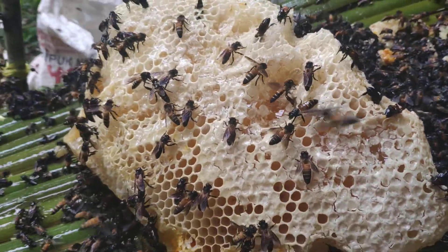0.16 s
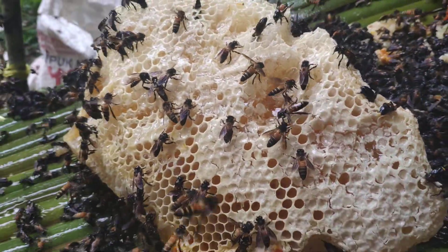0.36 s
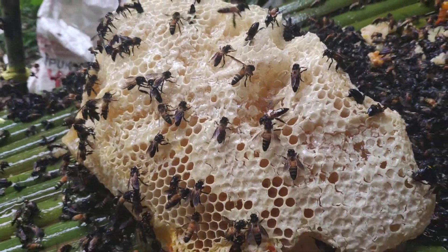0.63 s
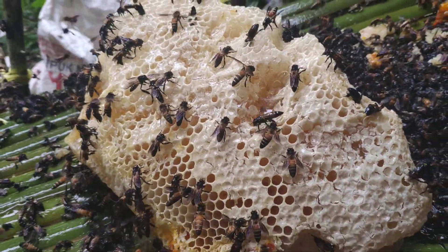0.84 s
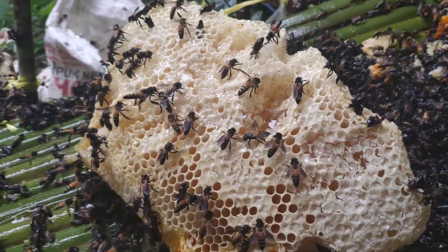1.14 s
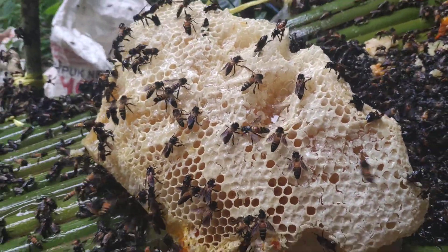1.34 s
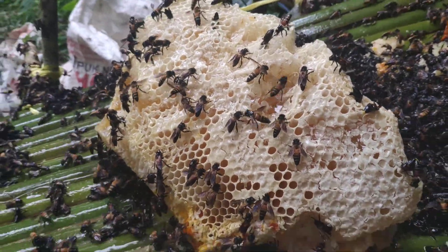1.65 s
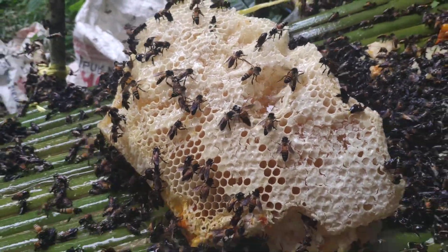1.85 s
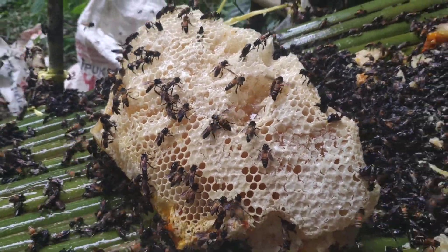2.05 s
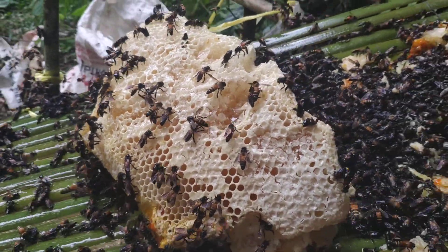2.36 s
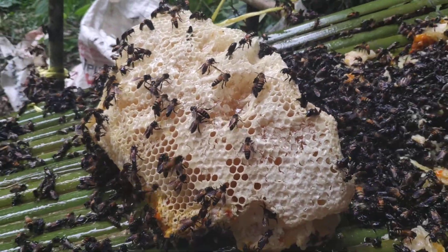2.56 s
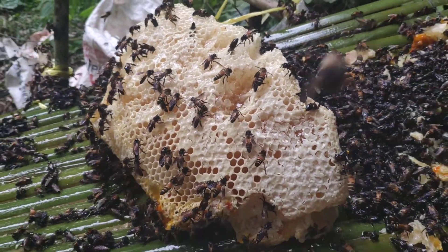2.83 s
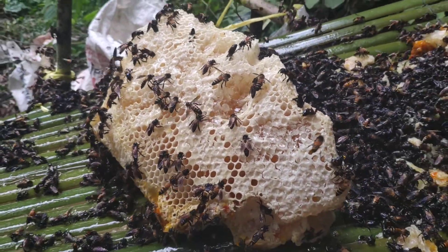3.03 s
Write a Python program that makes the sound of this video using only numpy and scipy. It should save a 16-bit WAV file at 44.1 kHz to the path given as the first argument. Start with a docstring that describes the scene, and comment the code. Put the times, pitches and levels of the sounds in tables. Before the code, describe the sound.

A swarm of bees buzzes low and close throughout, outdoors, over a fizzing rustle of bees crawling on leaves. One bee passes on the left at about 0.7 seconds, and another hovering on the right swells near 1 second. Short scrapes follow, then sharp little ticks at 1.7 and 1.9 seconds. A raspy wing brush and a scrape come around 2.5 seconds, with faint passes as the buzz continues.

```python
"""A colony of bees swarms close by, outdoors, around a broken-off honeycomb lying on palm leaves.
From the start, dozens of beating wings merge into a low buzz over the fizzing rustle of crawling bees.
In the first second a bee passes on the left, wings brush the comb, and a bee hovering on the right swells.
Short scrapes follow, and just before two seconds bees strike leaf and comb with the sharpest ticks.
Another brush, a scrape and a few fainter passes come last, while the buzz and rustle carry on."""
import sys
import numpy as np
from scipy import signal
from scipy.fft import rfft, irfft
from scipy.io import wavfile

SR = 44100
rng = np.random.default_rng(int(sys.argv[2]) if len(sys.argv) > 2 else 0)


def master_out(mix):
    """Clip the mix to full scale and print it as 16-bit PCM to the path in sys.argv[1]."""
    frames = np.transpose(np.atleast_2d(mix))
    ceiling = np.clip(frames, -1, 1)
    pcm = np.round(ceiling * 32767).astype(np.int16)
    wavfile.write(sys.argv[1], SR, pcm)


N = 140679

# The tone of a wing stroke in the swarm. Each row: frequency in Hz, relative level in dB.
SWARM_OVERTONES = [(135, -4.5), (255, 3), (300, 2), (410, -7), (550, -9), (720, -7.5), (1000, -12.5),
                   (1400, -19.5), (2500, -28), (4000, -39)]
SWARM_HZ, SPREAD_HZ, RISE_HZ_PER_S = 137.2, 9.5, 1.3  # wingbeats differ between bees and slowly speed up
WANDER_HZ, WANDER_PER_S, SWELL_DB = 3.5, 5, 2.5
SWARM_DB, SWARM_PAN_DB, WIDTH_DB = -37.5, -1, 6
SIDE_DELAY_S, LEFT_LEAD_S = 0.00043, 0.000074  # sound reaches the nearer side first


def swarm(bees=32, size=1024):
    """Many flying bees, each with its own wing stroke, wandering pitch, distance and side."""
    out, overtones = np.zeros((2, N)), np.arange(1, 24)
    from_middle_s = (np.arange(N) - N / 2) / SR
    rank = (np.arange(bees) + .5) / bees
    offsets = unit(np.log(rank / (1 - rank)))  # most bees stay near the average pitch
    for offset, bearing in zip(offsets, rng.permutation(2 * rank - 1)):
        mean_hz = SWARM_HZ + SPREAD_HZ * offset
        hz = mean_hz + RISE_HZ_PER_S * from_middle_s + WANDER_HZ * drift(WANDER_PER_S)
        beats = np.cumsum(hz) / SR
        strengths = amp(read(SWARM_OVERTONES, overtones * mean_hz))
        phases = np.exp(2j * np.pi * rng.random(len(overtones)))
        stroke = irfft(np.r_[0, strengths * phases], size)  # one wingbeat, played in a loop
        loop = np.r_[stroke, stroke[0]]
        gains = amp(SWELL_DB * drift(WANDER_PER_S)) * pan(WIDTH_DB * bearing)
        lead = mean_hz * (SIDE_DELAY_S * bearing + LEFT_LEAD_S) / 2
        for side, shift in enumerate((lead, -lead)):
            out[side] += gains[side] * np.interp((beats + shift) % 1 * size, np.arange(size + 1), loop)
    return amp(SWARM_DB) * pan(SWARM_PAN_DB) * unit(out)


# The hovering bee's flight. Each row: time in seconds, wingbeat in Hz, relative level in dB.
HOVER_PATH = [(0, 133.8, -41), (.12, 137.8, -37), (.28, 133, -69), (.47, 137.2, -35.5), (.56, 135.7, -45),
              (0.639, 133.7, -32.5), (.74, 129.7, -36), (.84, 129.6, -25), (1.031, 129.3, -25.5),
              (1.09, 125.4, -38.5), (1.13, 129.8, -30.5), (1.21, 133.5, -30), (1.37, 127.6, -41),
              (1.47, 130, -30.5), (1.66, 130.2, -44.5), (1.74, 132.7, -29.5), (1.87, 131.5, -27.5),
              (1.96, 133, -44), (2.04, 129.8, -35), (2.18, 129.6, -32.5), (2.33, 131.2, -38.5),
              (2.43, 129.2, -32.5), (2.72, 129, -35), (2.8, 136, -40), (2.88, 131, -37.5), (3.19, 133, -40)]
# The tone of one bee, hovering or passing. Each row: frequency in Hz, relative level in dB.
BEE_OVERTONES = [(130, 2), (260, -7.5), (390, -14), (520, -16), (660, -16), (800, -18.5), (1100, -26.5),
                 (1600, -38.5), (4000, -35)]
# Brief swells of its octave. Each row: middle in seconds, half length in seconds, level in dB.
OCTAVE_FLARES = [(0.487, 0.037, -43), (0.891, 0.034, -33), (0.983, .03, -32), (1.344, .03, -36),
                 (1.618, 0.024, -30), (1.754, 0.012, -30), (2.1, 0.057, -33)]


def hovering_bee(gain_db=-3, left_db=-27, jitter_hz=1.367):
    """One bee hangs on the right, moving in and out; now and then its octave flares."""
    times, path_hz, path_db = np.transpose(HOVER_PATH)
    t = np.arange(N) / SR
    level = amp(gain_db + np.interp(t, times, path_db))
    flares = sum(amp(db) * np.exp(-((t - at) / half) ** 2) for at, half, db in OCTAVE_FLARES)
    hz = np.interp(t, times, path_hz) + jitter_hz * drift(24.5)
    buzz = wingbeat(hz, BEE_OVERTONES, count=22, octave=flares / level)
    return level * buzz * amp([[left_db], [0]])


# Bees flying past. Each row: nearest moment in seconds, half length in seconds, wingbeat in Hz,
# relative level in dB.
FLY_PASTS = [(0.658, 0.03, 143.5, -28.5), (0.956, 0.035, 150.3, -40), (2.124, 0.043, 120.3, -40),
             (2.739, 0.086, 143.1, -46), (3.161, 0.057, 142, -43)]


def passing_bees(glide_hz=1.5, right_db=-13.5):
    """Each bee on the left swells and fades with distance while its pitch falls a little."""
    out = np.zeros(N)
    for at, half, hz, db in FLY_PASTS:
        along = (np.arange(N) / SR - at) / half
        buzz = wingbeat(hz - glide_hz * np.tanh(along), BEE_OVERTONES, count=10)
        out += amp(db) / (1 + along ** 2) * buzz
    return out * amp([[0], [right_db]])


# Wings touching the comb. Each row: middle in seconds, half length in seconds, level in dB,
# left minus right in dB.
WING_BRUSHES = [(0.693, .06, -50, -6), (1.246, 0.095, -47, -2), (2.441, 0.056, -42, -5)]
# Their raspy tone. Each row: frequency in Hz, relative level in dB.
BRUSH_OVERTONES = [(300, -10), (700, -1), (1020, 4), (1500, -10), (1900, -19), (2450, -1.5), (3400, -24)]


def wing_brushes(wingbeat_hz=147.7, jitter_hz=4):
    """Wings brush the comb for a moment: an unsteady buzz that is nearly all overtones."""
    t, level = np.arange(N) / SR, np.zeros((2, N))
    for at, half, db, pan_db in WING_BRUSHES:
        level += amp(db) * pan(pan_db) * np.exp(-((t - at) / half) ** 2)
    hz = wingbeat_hz + jitter_hz * drift(41.4)
    return level * np.array([unit(wingbeat(hz, BRUSH_OVERTONES, count=24)) for side in range(2)])


# How loud the crawling is. Each row: time in seconds, relative level in dB.
CRAWL_LEVELS = [(0, -33.5), (.45, -33), (.62, -32.5), (.75, -33), (.9, -32), (1.05, -32.5), (1.4, -33.5),
                (1.63, -33), (1.78, -31.5), (2.2, -32), (2.42, -33), (2.56, -32), (2.72, -33), (3.02, -33),
                (3.12, -32.5), (3.19, -31.5)]
HISS_DB, FLICKER_DB = 2.5, .5
STEPS_DB, STEPS_PER_S = -4.5, 1500
SCUFF_DB, SCUFFS_PER_S, SCUFF_DECAY_S = -7, 100, 0.0019


def crawling():
    """Countless feet and wings scrape the leaves: a fine hiss with nearer steps and scuffs."""
    times, db = np.transpose(CRAWL_LEVELS)
    hiss = rng.standard_normal((2, N)) * amp(FLICKER_DB * drift(19))
    fade = np.exp(-2 / SCUFF_DECAY_S / SR)  # each scuff starts suddenly and dies quickly
    scuff_power = signal.lfilter([1], [1, -fade], abs(contacts(SCUFFS_PER_S)))
    scuffs = unit(np.sqrt(scuff_power) * rng.standard_normal((2, N)))
    touches = amp(HISS_DB) * hiss + amp(STEPS_DB) * contacts(STEPS_PER_S) + amp(SCUFF_DB) * scuffs
    return amp(np.interp(np.arange(N) / SR, times, db)) * bright_ring(touches)


# The tone of the rustle. Each row: frequency in Hz, relative left and right levels in dB.
RUSTLE_SPECTRUM = [(298, -28.5, -32.5), (1450, -23, -17.5), (3160, -20.5, -19), (4370, -20, -17),
                   (6140, -17.5, -14.5), (6820, -11.5, -10), (7490, -16.5, -7.5), (8500, -9, 0),
                   (9720, -5, -6), (10420, -8, -12), (12270, -17, -13.0), (14000, -16.5, -15.5),
                   (15400, -20, -15.5)]


def bright_ring(touches, size=2048):
    """Every small contact gets a bright ring, a little different on each side."""
    hz, table = np.fft.rfftfreq(size, 1 / SR), np.array(RUSTLE_SPECTRUM)
    gain = amp([read(table[:, [0, 1]], hz), read(table[:, [0, 2]], hz)])
    log_gain = np.log(np.concatenate([gain, gain[:, -2:0:-1]], axis=1))
    spectrum = np.exp(np.conj(signal.hilbert(log_gain)))  # makes the ring come after the touch
    ring = np.fft.ifft(spectrum).real[:, :size // 2]
    ring /= np.sqrt(np.sum(ring ** 2) / 2)
    return signal.oaconvolve(touches, ring, axes=1)[:, :touches.shape[1]]


# Nearer bees scraping. Each row: start in seconds, length in seconds, level in dB, left minus right in dB.
NEAR_SCRAPES = [(1.097, 0.047, -30, 4), (1.25, .04, -30.5, -2), (1.707, .03, -38, -7),
                (2.559, 0.033, -33, -5)]


def scrapes(grains_per_s=1500):
    """A nearer bee scrapes the leaf: a grainy burst that starts quickly and dies away."""
    level = np.zeros((2, N))
    for start, length, db, pan_db in NEAR_SCRAPES:
        progress = np.maximum(np.arange(N) / SR - start, 0) / length
        level += amp(db) * pan(pan_db) * np.minimum(10 * progress, 1) * np.exp(-progress ** 2)
    grains = unit(contacts(grains_per_s) + rng.standard_normal((2, N)))
    return bright_ring(level * grains)


# Sharp little knocks. Each row: start in seconds, level in dB, left minus right in dB, pitch in Hz,
# rise time in seconds.
BEE_STRIKES = [(0.097, -21, -3, 12500, .00008), (1.2592, -18, -4, 8900, .0003),
               (1.7222, -9.5, -8, 12500, .00005), (1.73, -15, -9, 11500, .00006),
               (1.7414, -18, -6, 10500, .00004), (1.9113, -9.3, 10, 9700, .00017),
               (1.9147, -22, -3, 9200, .0003)]
BODY_HZ, BODY_DB, BODY_DECAY_S = 4800, -22, 0.002
SCATTER_GAIN, SCATTER_DECAY_S = 0.2, 0.0037


def ticks(size=1024):
    """Bees strike leaf and comb: a bright snap, a lower ring of the leaf and a short scatter of noise."""
    out, t = np.zeros((2, N)), np.arange(size) / SR
    for start, db, pan_db, hz, rise in BEE_STRIKES:
        snap = (t / rise * np.exp(1 - t / rise)) ** 2 * np.sin(2 * np.pi * hz * t)
        body = amp(BODY_DB) * np.exp(-t / BODY_DECAY_S) * np.sin(2 * np.pi * BODY_HZ * t)
        scatter = bright_ring(rng.standard_normal((2, size)) * np.exp(-t / SCATTER_DECAY_S))
        tick = amp(db) * (pan(pan_db) * (snap + body) + SCATTER_GAIN * scatter)
        slot = out[:, round(start * SR):][:, :size]
        slot += tick[:, :slot.shape[1]]
    return out


# The tone of the open air. Each row: frequency in Hz, relative level in dB.
AIR_SPECTRUM = [(10, -17), (30, 4.5), (55, -6), (95, 6), (200, 7), (450, 2), (750, -2.5), (1300, -11),
                (2500, -20), (6000, -28)]


def air(db=-43.5, pan_db=-4.5):
    """Outdoor air makes a soft, dull noise behind everything."""
    gain = amp(read(AIR_SPECTRUM, np.fft.rfftfreq(N, 1 / SR)))
    noise = irfft(rfft(rng.standard_normal((2, N))) * gain, N)
    return amp(db) * pan(pan_db) * unit(noise)


def wingbeat(hz, tone, count, octave=0, turn_db=2, turn_rad=0.58, turns_per_s=14):
    """One bee's wings buzz; each overtone shifts in strength and timing as the bee turns."""
    phase = 2 * np.pi * np.cumsum(hz) / SR
    out = amp(read(tone, hz.mean())) * np.cos(phase)
    for k in range(2, count):
        shift = turn_rad * drift(turns_per_s) + rng.uniform(0, 2 * np.pi)
        gain = amp(read(tone, k * hz.mean()) + turn_db * drift(turns_per_s)) + octave * (k == 2)
        out += gain * np.cos(k * phase + shift)
    return np.sqrt(2) * out


def contacts(per_s):
    """Tiny impacts of uneven size at random moments."""
    sizes = amp(np.minimum(rng.exponential(1, (2, N)), 4))
    signs = rng.choice([-1, 1], (2, N))
    hits = rng.random((2, N)) < per_s / SR
    return unit(sizes * signs * hits)


def drift(per_s, count=1024):
    """A smooth random wobble of typical size 1, up to about the given rate."""
    hz = np.fft.rfftfreq(count, 2 * N / SR / count)
    spectrum = rfft(rng.standard_normal(count)) / np.sqrt(1 + (hz / per_s) ** 6)
    return np.interp(np.arange(N), np.linspace(0, 2 * N, count), unit(irfft(spectrum)))


def amp(db):
    """Turns decibels into a gain."""
    return 10 ** (np.asarray(db) / 20)


def unit(x):
    """Scales a signal to an average power of 1."""
    return x / np.sqrt(np.mean(x ** 2) + 1e-20)


def read(points, hz):
    """Looks up a level between the rows of a tone table, spacing octaves evenly."""
    row_hz, db = np.transpose(points)
    return np.interp(np.log(hz + 1), np.log(row_hz + 1), db)


def pan(db):
    """Left and right gains; positive dB leans left."""
    return amp(np.array([[.5], [-.5]]) * db)


def scene():
    """Flying bees over the rustle of the crawling ones."""
    flying = swarm() + hovering_bee() + passing_bees()
    return flying + crawling() + scrapes() + ticks() + air() + wing_brushes()


def record(dry):
    """Cuts off the highest treble, above 15900 Hz."""
    lowpass = signal.firwin(511, 15900, window=("kaiser", 9), fs=SR)
    return signal.oaconvolve(dry, lowpass[None], "same")


dry = scene()
out = record(dry)
master_out(out)
```